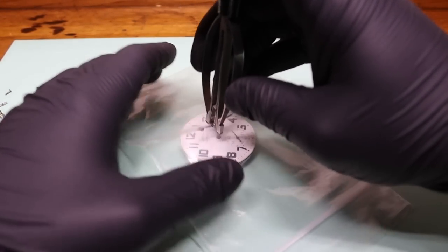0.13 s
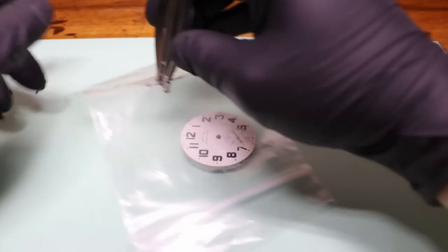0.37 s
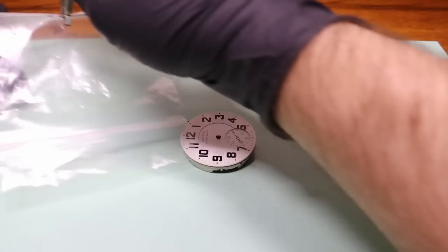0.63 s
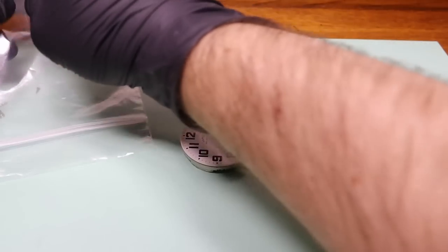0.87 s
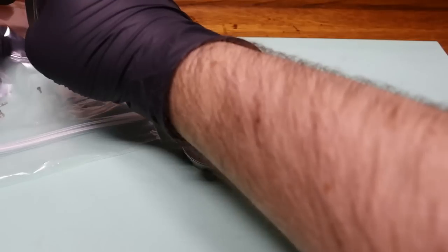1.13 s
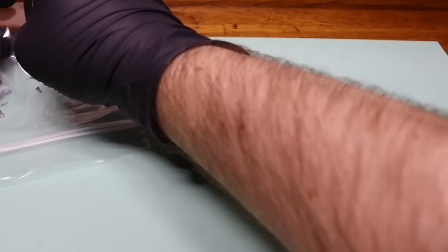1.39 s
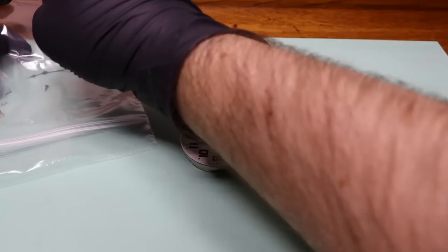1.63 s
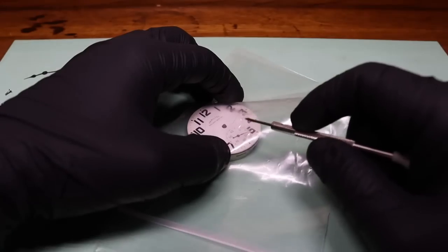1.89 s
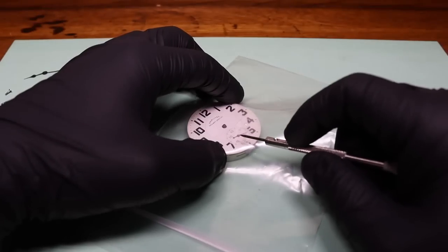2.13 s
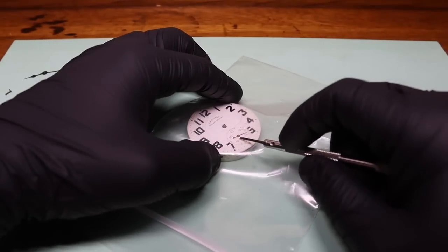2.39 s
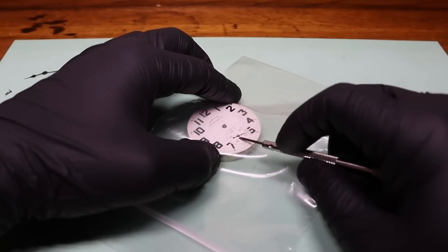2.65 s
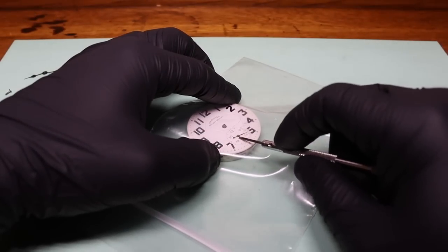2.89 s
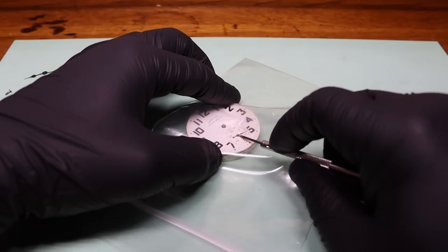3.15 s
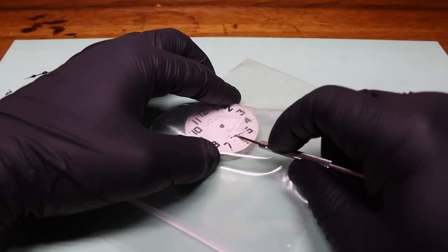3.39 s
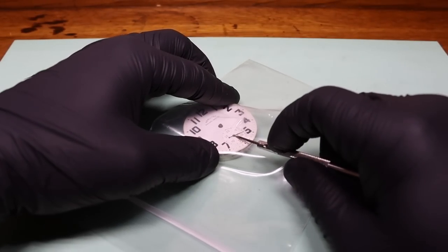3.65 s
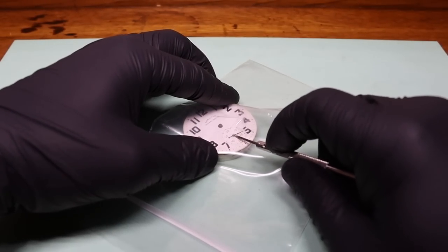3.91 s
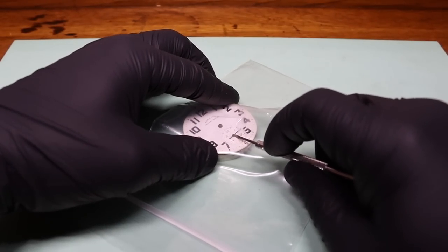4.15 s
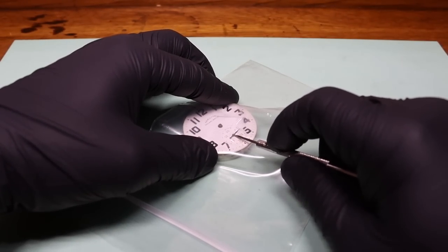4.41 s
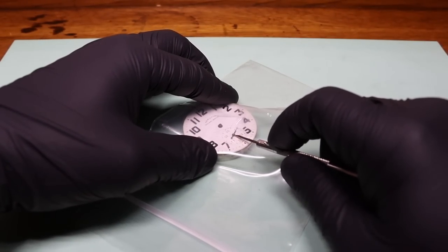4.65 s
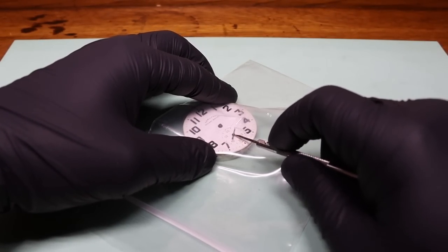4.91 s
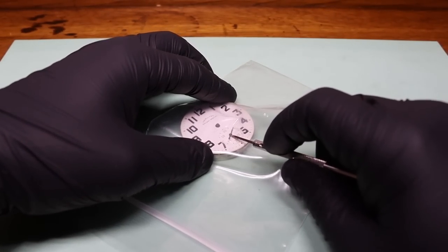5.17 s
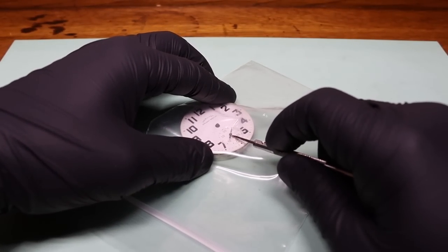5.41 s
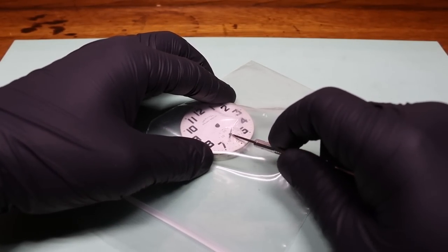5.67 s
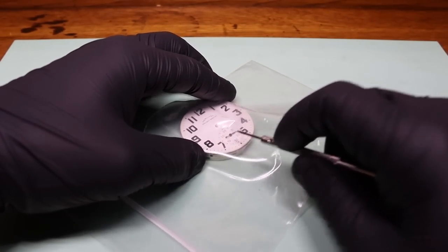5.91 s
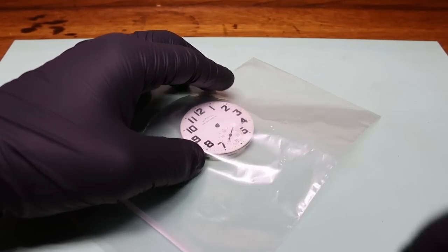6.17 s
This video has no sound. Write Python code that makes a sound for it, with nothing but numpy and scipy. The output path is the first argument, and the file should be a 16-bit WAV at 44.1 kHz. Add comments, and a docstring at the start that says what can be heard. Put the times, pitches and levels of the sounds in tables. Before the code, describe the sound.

Close to a small microphone in a quiet room, gloved hands handle a watch dial through thin plastic. Irregular snaps and tool ticks crowd the first two seconds over rustling film and soft bench thumps. Faint wavering whistles pass, then one strong knock with low rumble. A calmer stretch follows before snaps return and the crinkling grows to the end, all over airy high hiss.

```python
"""Gloved hands work on a watch dial through a thin plastic bag on a bench, close to a small microphone.
Throughout, shaped noise makes a treble hiss, film rustle, and the rumble of arms shifting on the bench.
Snaps and tool ticks crowd the first two seconds: short jolts ringing in resonators. Bumps ring bench modes.
Faint wavering sine whistles follow from 2.2 s, then the strongest knock at 3.56 s and a calmer stretch.
From about 5 s the snaps return, and the rustle grows towards the end."""
import sys
import numpy as np
from scipy import signal
from scipy.fft import rfft, irfft, next_fast_len
from scipy.io import wavfile
from scipy.ndimage import uniform_filter1d

SR = 44100
rng = np.random.default_rng(int(sys.argv[2]) if len(sys.argv) > 2 else 0)


def digitize_waveform(pressure):
    """Quantize a signal to 16-bit integers and store it at the path in sys.argv[1].

    Rows of a 2-D input are taken as channels; values are limited to [-1, 1].
    """
    field = np.atleast_2d(pressure).T
    bounded = np.clip(field, -1, 1)
    quanta = np.round(bounded * 32767).astype(np.int16)
    wavfile.write(sys.argv[1], SR, quanta)


def voltage_ratio(decibels):
    """Convert decibels (scalar or array-like) to amplitude ratios, 20 dB per decade."""
    exponent = np.asarray(decibels, float) / 20
    return 10 ** exponent


N = 277830  # samples, 6.3 s


def evened(x):
    """Scales a sound to an rms (average strength) of 1."""
    return x / np.sqrt(np.mean(x ** 2) + 1e-20)


def read(points, hz):
    """Reads a table between its points, along a logarithmic frequency axis."""
    f, value = np.transpose(points)
    return np.interp(np.log(hz + 1), np.log(f + 1), value)


def curve(rows, column):
    """Draws straight lines between the rows: one table column at every sample."""
    times = [row[0] for row in rows]
    return np.interp(np.arange(N) / SR, times, [row[column] for row in rows])


def add(mix, s, sound):
    """Mixes a sound in, starting at time s."""
    part = mix[round(s * SR):][:len(sound)]
    part += sound[:len(part)]


def coloured(x, points):
    """Makes each frequency louder or softer, as a (f/Hz, level/dB) table says."""
    size = next_fast_len(len(x))
    gain = voltage_ratio(read(points, np.fft.rfftfreq(size, 1 / SR)))
    return irfft(rfft(x, size) * gain, size)[:len(x)]


def noise_of(points):
    """Steady noise with the given spectrum, rms 1."""
    return evened(coloured(rng.standard_normal(N), points))


def ring(x, hz, width):
    """A damped resonator driven by x, peak 1; a wider resonance dies sooner."""
    r = np.exp(-np.pi * width / SR)
    y = signal.lfilter([1, 0, -r], [1, -2 * r * np.cos(2 * np.pi * hz / SR), r * r], x)
    return y / (abs(y).max() + 1e-20)


# spectrum of room tone and hiss, then its top edge: (f/Hz, level/dB)
HISS = [(30, 17), (60, 13), (120, 16), (400, -1), (1000, 0), (2600, -4), (5200, -9), (6900, -6), (9000, -5),
        (11200, 2), (11800, -1), (14300, -5.5)]
HISS_TOP = [(14850, -14), (15300, -8), (15720, -9), (15800, -60)]
# thin ridges in the hiss: (f/Hz, width/Hz, level/dB)
RIDGES = [(10600, 15, 16), (11000, 120, 5.5), (10080, 30, 17), (10700, 43, 14.5), (11400, 38, 3),
          (11320, 170, 6), (11400, 27, 9.5)]


def hiss():
    """Random short-time spectra with small drifting patches, long thin streaks and a few ridges."""
    frames, hz = N // 256 + 5, np.fft.rfftfreq(1024, 1 / SR)
    a, b, patches, streaks = rng.standard_normal((frames, 513, 4)).T
    # patches are smoothed over frequency and time, streaks over time alone
    patches = uniform_filter1d(patches, size=10, axis=0)
    patches = evened(uniform_filter1d(patches, size=16, axis=1))
    streaks = evened(uniform_filter1d(streaks, size=30, axis=1))
    ridges = sum(db * np.exp(-((hz - f) / width) ** 2) for f, width, db in RIDGES)
    spectrum_db = (read(HISS + HISS_TOP, hz) + ridges)[:, None]
    z = (a + 1j * b) * voltage_ratio(spectrum_db + 0.36 * patches + 2.5 * streaks)
    return voltage_ratio(-51.5) * evened(signal.istft(z, nperseg=1024, noverlap=768)[1][:N])


# faint whistles: (start t/s, length t/s, f/Hz, level/dB, sag f/Hz; a negative sag rises)
WHISTLES = [(2.2, 0.17, 3550, -62, 36), (2.345, 0.044, 2750, -64, 20), (2.383, 0.069, 2700, -62, 18),
            (2.431, .125, 2710, -53, 69), (2.576, 0.26, 2640, -57, -34), (2.8, 0.1, 2670, -62.5, -35),
            (3.34, 0.0077, 5230, -47, -150)]


def whistles():
    """Thin faint sine tones that swell, waver, glide and fade."""
    out = np.zeros(N)
    waver_hz, waver_db = 11, 2.0  # rms wavering of pitch and of level
    for s, length, hz, db, sag_hz in WHISTLES:
        u = np.arange(0, length, 1 / SR) / length  # 0 to 1 along the whistle
        drift, flutter = (evened(uniform_filter1d(rng.standard_normal(len(u)), size=500)) for _ in range(2))
        pitch = hz - sag_hz * u + waver_hz * drift
        tone = np.sqrt(2) * np.sin(2 * np.pi * np.cumsum(pitch) / SR)
        swell = np.sin(np.pi * u) ** 0.7
        add(out, s, voltage_ratio(db + waver_db * flutter) * tone * swell)
    return out


# how hard the film is dragged and how fast it slides: (t/s, drag level/dB, speed level/dB)
DRAG = [(0.0, -62.5, 3.5), (0.2, -56.5, -3.5), (0.35, -51.5, -0.5), (0.46, -53.5, 2.5), (0.77, -56, -3),
        (0.79, -48.5, 0), (1.0, -55.5, -3), (1.4, -55.5, -5.5), (1.59, -61.5, 0), (1.81, -66, 4.5),
        (1.84, -50, -0.5), (1.974, -47, -2), (2.02, -51.5, -4.5), (2.4, -59.5, -1.5), (2.5, -58.5, -6),
        (2.86, -68, 2.5), (3.11, -53.5, -8), (3.25, -54.5, -8), (3.61, -52.5, -8.5), (3.75, -58.5, -2),
        (4.14, -60.5, -5), (4.37, -68.5, 1.5), (5.04, -61.5, -2), (5.08, -47.5, -12), (5.2, -56, -3),
        (5.42, -60, -3.5), (5.68, -62, -5), (5.9, -56, -1), (6.0, -45.5, 0), (6.07, -54, -0.5),
        (6.16, -46.5, 4.5), (6.3, -42.5, -2)]


def film_drag():
    """The hands' pull on the film: drag level, and drag plus sliding speed, in dB at every sample."""
    drag_db = curve(DRAG, column=1)
    return drag_db, drag_db + curve(DRAG, column=2)


# arms shifting on the bench: (t/s, half length t/s, rumble level/dB, sway level/dB)
SHIFTS = [(0.17, 0.036, -68, -82), (0.373, 0.053, -66, -82), (0.893, 0.1, -55, -49), (1.07, 0.12, -54, -47),
          (1.35, 0.019, -72, -49), (1.536, 0.062, -64, -54.5), (1.905, 0.084, -51.5, -39),
          (2.08, 0.1, -49.5, -47), (2.536, 0.027, -57, -77), (2.757, 0.092, -45.5, -64),
          (3.27, 0.087, -61, -55), (3.497, 0.14, -42.5, -43), (3.788, 0.09, -52.5, -46),
          (3.977, 0.067, -66, -52), (4.164, 0.07, -50.5, -56.5), (4.37, 0.13, -67, -50),
          (4.74, 0.12, -57.5, -76), (5.183, 0.13, -59, -46), (5.6, 0.22, -77, -80), (5.95, 0.026, -55, -52),
          (6.03, 0.073, -47, -53), (6.134, 0.14, -58, -53)]
# spectra of the arms' rumble and of the gloves scraping on the mat: (f/Hz, level/dB)
RUMBLE = [(40, -50), (70, -7), (125, 4.5), (200, -14.5), (350, -16), (700, -39.5)]
SCRAPE = [(120, -18), (220, 3), (400, 5.5), (650, 4.5), (1200, -24.5)]


def arms():
    """Each shift of an arm swells and fades as rumble and deep sway noise; the gloves scrape along."""
    t = np.arange(N) / SR
    heavy, deep = np.full(N, voltage_ratio(-72)), np.full(N, voltage_ratio(-70))  # levels at rest
    for s, half, rumble_db, sway_db in SHIFTS:
        swell = np.exp(-((t - s) / half) ** 2)
        heavy += voltage_ratio(rumble_db) * swell
        deep += voltage_ratio(sway_db) * swell
    # the scrape follows both the film's drag and the arms' rumble
    drag_db, _ = film_drag()
    rub = voltage_ratio(0.83 * drag_db - 18.5) + voltage_ratio(-15) * heavy
    sway = noise_of([(8, -32), (18, 24), (32, -27), (55, -21), (300, -86)])
    # cubing the noise makes it rougher, with rare strong peaks
    scrape = evened(coloured(rng.standard_normal(N) ** 3, SCRAPE))
    return heavy * noise_of(RUMBLE) + deep * sway + rub * scrape


# bumps on the bench: (t/s, level/dB before the final scaling, pitch of the push f/Hz, factor on ring length)
BUMPS = [(0.838, -38, 162, 0.56), (0.993, -50, 94.2, 0.66), (1.096, -40, 177, 1), (1.511, -32.5, 397, 0.55),
         (1.866, -22, 127, 0.78), (1.898, -19.5, 124, 0.6), (2.129, -28.5, 131, 1),
         (2.683, -15.5, 132, 0.82), (2.731, -24, 131, 0.53), (2.808, -35, 143, 0.79), (3.383, -20, 142, 1),
         (3.438, -20.5, 109, 0.7), (3.497, -26, 139, 1), (3.572, -27, 250, 0.87), (3.737, -30.5, 127, 1),
         (3.786, -43, 80.7, 0.56), (4.127, -26.5, 83.4, 0.77), (4.277, -27, 130, 0.88),
         (4.764, -31, 72.7, 0.83), (5.123, -29, 152, 0.92), (5.276, -32.5, 157, 0.99),
         (5.99, -14, 181, 0.65), (6.166, -28, 148, 0.61)]
# ringing modes of the bench top: (f/Hz, level/dB, time to fall 60 dB t/s)
BENCH = [(82.6, -11, 0.43), (132.3, 1.5, 0.1), (172.5, 1, 0.13), (246.4, 4.5, 0.089), (404, -7, 0.27),
         (553, 6, 0.11)]


def bench():
    """Each push of hand or elbow rings the bench top, most the modes near its own pitch."""
    out, t = np.zeros(N), np.arange(12000) / SR
    onset = 1 - np.exp(-t / 0.0069)
    for s, db, push_hz, hold in BUMPS:
        modes = np.zeros(len(t))
        for hz, mode_db, t60 in BENCH:
            octaves_off = abs(np.log2(hz / push_hz))
            decay_db = -60 * t / (t60 * max(hold, 0.2))
            modes += voltage_ratio(mode_db - 11.1 * octaves_off + decay_db) * np.sin(2 * np.pi * hz * t)
        add(out, s, voltage_ratio(db) * 0.55 * modes * onset)
    return out


def creases(points, level_db, grain_db, per_s):
    """Many tiny creases of unequal size, coming in clumps, over a soft rubbing noise."""
    clumps = voltage_ratio(4 * evened(uniform_filter1d(rng.standard_normal(N), size=900)))
    happens = rng.random(N) < clumps * per_s / SR
    size = voltage_ratio(grain_db * np.minimum(rng.exponential(1, N), 3.5)) * happens
    drive = evened(size * rng.standard_normal(N)) + 1.32 * rng.standard_normal(N)
    return voltage_ratio(level_db) * evened(coloured(drive, points))


# spectra of the low, bright and airy rustle: (f/Hz, level/dB)
LOW_RUSTLE = [(200, -14), (500, -8.5), (1000, 1), (2500, -1), (3500, -0.5), (6000, -27.5)]
BRIGHT_RUSTLE = [(1500, -42), (3000, -5), (4200, 3), (5300, -0.5), (6500, -11.5), (10000, -40)]
AIRY_RUSTLE = [(3500, -14), (5500, -2.5), (7000, -1.5), (9500, -1), (15500, -2.5), (16500, -56)]


def rustle():
    """Dragged film creases: low rustle follows the drag, the brighter kinds follow its speed too."""
    drag_db, fast_db = film_drag()
    low = creases(LOW_RUSTLE, drag_db, grain_db=7.0, per_s=1400)
    bright = creases(BRIGHT_RUSTLE, fast_db, grain_db=9.0, per_s=1500)
    # the airy rustle follows the bright one only in part
    airy = creases(AIRY_RUSTLE, 0.42 * fast_db - 25, grain_db=-3.5, per_s=2400)
    return low + bright + airy


# snaps, ticks and knocks, levels before the mix of parts:
# (t/s, level/dB, base pitch f/Hz, edge level/dB, room answer level/dB, held to -13 at most)
SNAPS = [(0.174, -38, 1450, 11, -16), (0.25, -33.5, 1250, -15, -38), (0.262, -25, 2300, -20, -36),
         (0.413, -33.5, 7000, -6, -12), (0.535, -24, 6810, -12, -18), (0.542, -22, 2900, -5, -19),
         (0.571, -21.5, 6700, -16, -7), (0.597, -39, 1200, 1, -27), (0.639, -31.5, 2520, 5, -13.5),
         (0.792, -34.5, 1180, -5, -17), (0.826, -18, 1000, -22, -25), (0.831, -19.5, 2290, -11, -27),
         (0.871, -28.5, 1290, -18, -14), (0.903, -28, 3760, -25, -10), (0.927, -29.5, 1980, -10, -18),
         (0.949, -39, 2180, -8, -16), (0.964, -32, 1650, -16, -31), (0.982, -38, 1560, -12, -39),
         (1.03, -30, 700, 11, -30), (1.031, -20, 1700, -41, -28), (1.123, -30, 3000, 0, -17),
         (1.128, -32.5, 1230, -3, -23), (1.217, -38, 1060, -21, -35), (1.253, -28, 1150, -35, -23),
         (1.333, -31, 940, -21, -20.5), (1.438, -10, 5100, 0.5, -24.5), (1.442, -21.5, 3950, -17, -20),
         (1.508, -16.5, 5040, -5, -19), (1.523, -26.5, 3700, -18, -20.5), (1.834, -24.5, 1250, -30, -41),
         (1.837, -22, 2540, -20, -22), (1.848, -32, 1410, -18, -24), (1.862, -28, 950, -29, -23),
         (1.893, -23, 2430, -5, -15), (1.897, -16.5, 2870, -33, -29.5), (1.934, -28.5, 2510, 0, -13),
         (1.951, -28, 1060, -1, -20), (1.988, -30.5, 1530, -6, -30), (2.002, -30.5, 1370, -19, -39),
         (2.424, -38, 2690, -19, -33), (2.795, -28.5, 2320, -15, -24.5), (3.127, -30.5, 2000, -27, -23),
         (3.153, -32, 1100, -4, -30), (3.159, -31, 1670, -12, -20), (3.221, -34, 2500, -20, -30),
         (3.208, -33, 1200, -4, -30), (3.232, -20, 2320, 5.5, -31), (3.535, -33, 1380, -23, -35),
         (3.554, -21, 1590, -32, -31), (3.556, -15.5, 1720, -9, -13), (3.562, -10.5, 1410, 2, -11),
         (3.563, 0, 2550, -10, -18.5), (3.672, -19, 1870, 11, -27.5), (3.734, -30.5, 2220, -24, -22),
         (4.717, -25, 1960, 1, -20), (5.057, -31.5, 1980, -27, -33), (5.084, -32, 1370, -24, -13),
         (5.1, -26.5, 2330, -2, 3), (5.133, -4.5, 4620, -13, -29.5), (5.281, -22.5, 2310, -4, -24),
         (5.665, -18.5, 1360, -20, -18), (5.672, -22.5, 1490, 3, -31), (5.68, -24, 1490, 2, -41),
         (5.693, -26.5, 1380, 3.5, -16), (5.73, -11.5, 2500, -18, -26), (5.892, -11, 2230, -22, -29),
         (5.924, -22, 1570, -22, -22.5), (5.937, -25, 2520, -23, -11), (5.95, -24.5, 2290, -20, -16.5),
         (5.955, -24, 1090, -20, -21), (5.965, -18, 2620, -2, -27.5), (5.985, -20.5, 1120, 0, -27),
         (6.051, -31.5, 2200, -11, -25), (6.078, -31, 2130, -14, -19)]
# rings of a patch of film: (ratio to the base pitch, level/dB)
PATCH = [(0.981, 5.5), (1.07, -6), (0.725, -4), (1.7, -18.5), (0.584, -6), (2.7, -26.5)]
# dull body and sharpest crack: (f/Hz, width/Hz)
BODY = (1450, 1700)
CRACK = (11000, 1800)
# sharp edge: (f/Hz, width/Hz, level/dB, share of the snap's edge level it follows)
EDGE = [(4140, 2240, -2, 0.85), (5400, 5400, 2, 0.98), (10700, 11000, -12.5, 0.95)]
# how long the room answers: (f/Hz, time to fall 60 dB t/s)
ROOM = [(150, 0.31), (700, 0.38), (1200, 0.38), (1800, 0.31), (2500, 0.26), (6000, 0.33), (12000, 0.071)]


def snaps_and_knocks():
    """Buckling film or a blow gives shrinking jolts; a patch rings, with a dull body and sharp edge."""
    out, t = np.zeros(N), np.arange(13000) / SR
    for s, db, hz, edge_db, room_db in SNAPS:
        jolts = rng.standard_normal(len(t)) * 0.8 * voltage_ratio(-60 * t / 0.013)
        jolts[0] = 3
        # the room answers with a dense noise whose length depends on frequency
        echoes = voltage_ratio(min(room_db, -13)) * rng.standard_normal(len(t)) * (1 - np.exp(-t / 0.0033))

        def steep(f, width):
            """Jolts and room answer through the same resonator twice, for steeper sides."""
            fade = voltage_ratio(-60 * t / read(ROOM, f)) + 2.27 * voltage_ratio(-60 * t / 0.046)
            return ring(ring(jolts + echoes * fade, f, width), f, width)

        patch = sum(voltage_ratio(d) * steep(min(hz * ratio, 18000), hz * ratio * 0.5) for ratio, d in PATCH)
        # the duller the sound, the fuller its body
        body = voltage_ratio(-9.5 - 0.17 * edge_db) * steep(*BODY)
        edge = sum(voltage_ratio(edge_db * share + d) * steep(f, width) for f, width, d, share in EDGE)
        crack = voltage_ratio(-20.5) * steep(*CRACK)
        hit = 0.29 * patch + 0.5 * body + 0.26 * edge + crack
        add(out, s + 0.001213, voltage_ratio(db) * hit)  # each starts 1.2 ms after its table time
    return out


# colour of these sounds at the microphone, with a dip from its casing: (f/Hz, level/dB)
MIC = [(60, 1.5), (1500, -2), (2600, 1), (3100, -7.5), (3600, -1), (9000, -3), (16000, -6)]


def film_and_tools():
    """Snaps, ticks, knocks and rustle together, coloured by the microphone casing."""
    return coloured(snaps_and_knocks() + rustle(), MIC)


def scene():
    """Hiss, whistles, arms, bench, film and tools, alike in both channels."""
    return np.tile(hiss() + whistles() + arms() + bench() + film_and_tools(), (2, 1))


# change of each band by the noise suppressor, applied by half at most: (f/Hz, level/dB)
QUIET_CUT = [(300, -11), (500, -18.5), (2550, -5), (2750, -29), (5100, -8), (5350, -35.5), (6700, -30),
             (6900, 11), (20000, 10)]


def suppressed(x):
    """Cuts (or, in the high treble, lifts) each band while near its own steady noise; loud sound opens it."""
    hz, _, z = signal.stft(x, SR, nperseg=512, noverlap=384)
    power = uniform_filter1d(abs(z) ** 2, size=9, axis=0)
    power = uniform_filter1d(power, size=9, axis=1)
    steady = np.percentile(power, 20, axis=1)[:, None]
    over_db = 10 * np.log10(power / steady + 1e-9)
    shut = 1 / (2.0 + np.exp((over_db + 1.0) / 3.63))  # near 0 when loud, up to 0.5 when quiet
    gain = voltage_ratio(read(QUIET_CUT, hz)[:, None] * shut)
    return signal.istft(z * gain, SR, nperseg=512, noverlap=384)[1][:N]


# how far the channel difference lies under the sum: (f/Hz, level/dB)
UNLIKE = [(30, -33), (250, -33), (1500, -31.5), (4000, -29), (12000, -46.5)]


def two_channels(mid):
    """Makes two nearly equal channels with a slight phase mismatch."""
    shifted = signal.hilbert(mid, next_fast_len(N)).imag[:N]  # a quarter turn of phase
    side = coloured(shifted, UNLIKE)
    return np.array([mid + side, mid - side])


def top_cut(x):
    """Nothing passes above the cut-off."""
    return signal.sosfilt(signal.butter(12, 16670, fs=SR, output="sos"), x)


def record(dry):
    """One microphone with noise suppression, on two nearly equal channels."""
    mid = suppressed(dry[0])
    return top_cut(two_channels(mid))


dry = scene()
out = record(dry)
digitize_waveform(out)
```